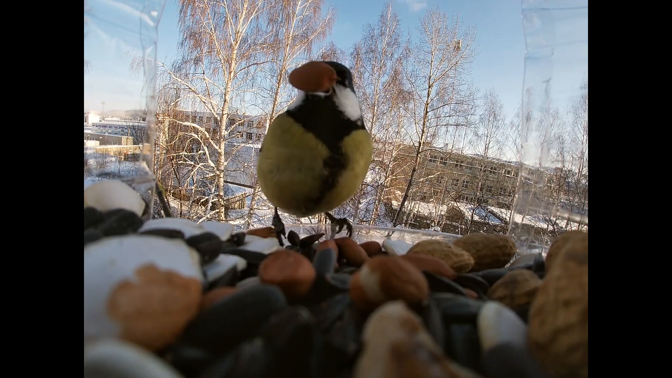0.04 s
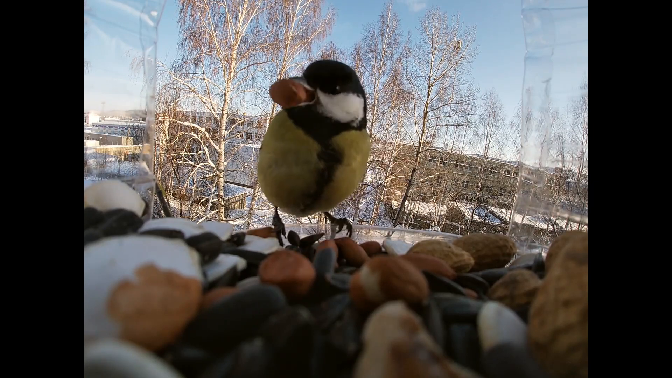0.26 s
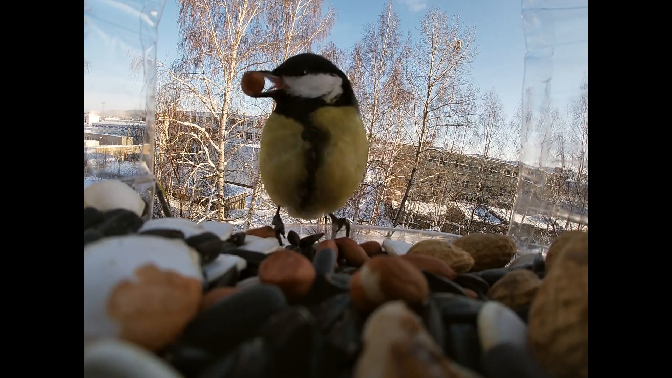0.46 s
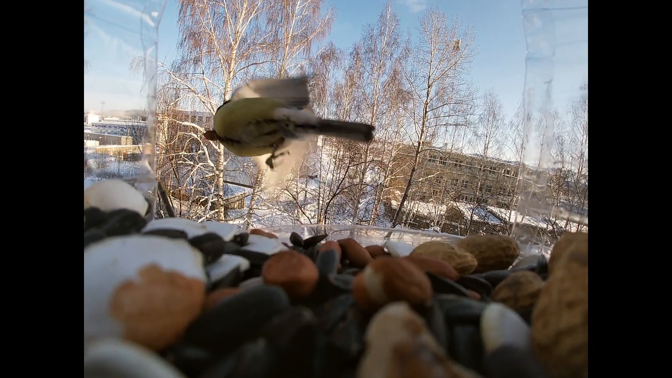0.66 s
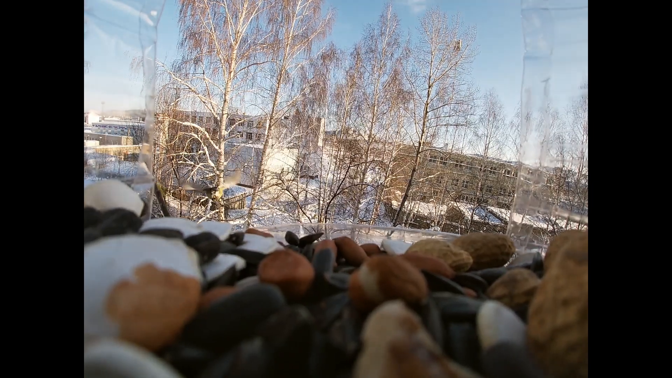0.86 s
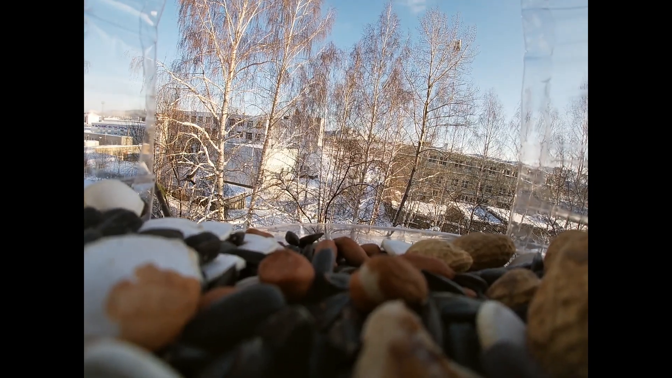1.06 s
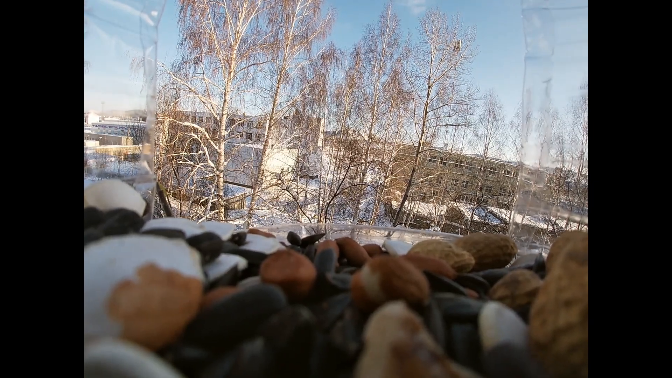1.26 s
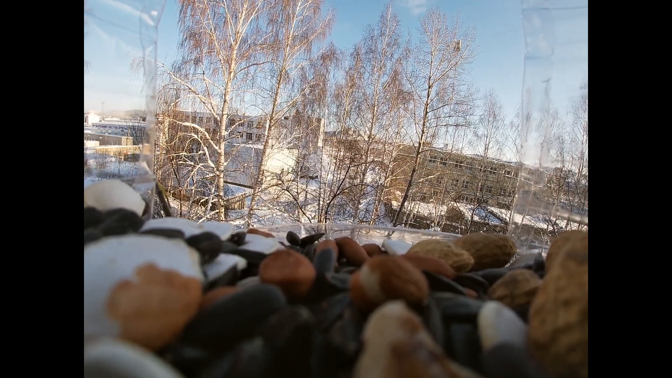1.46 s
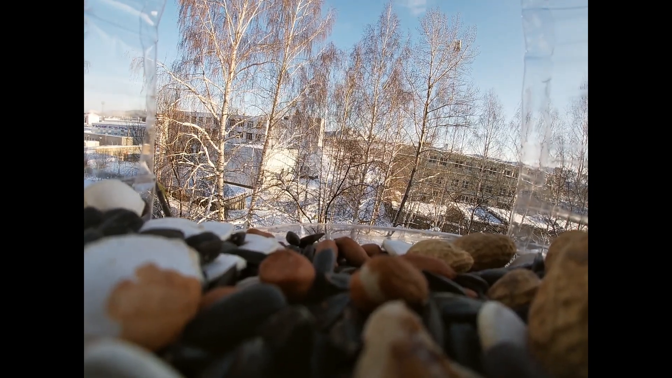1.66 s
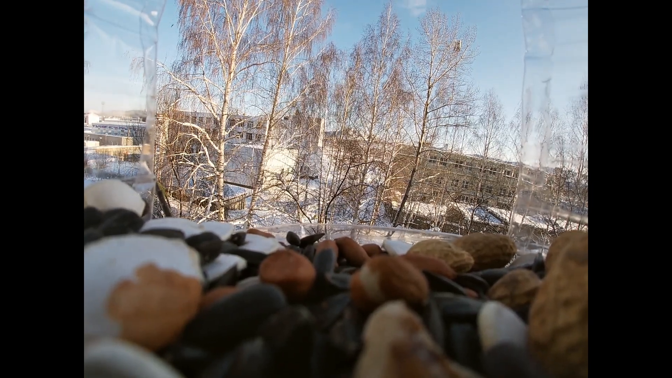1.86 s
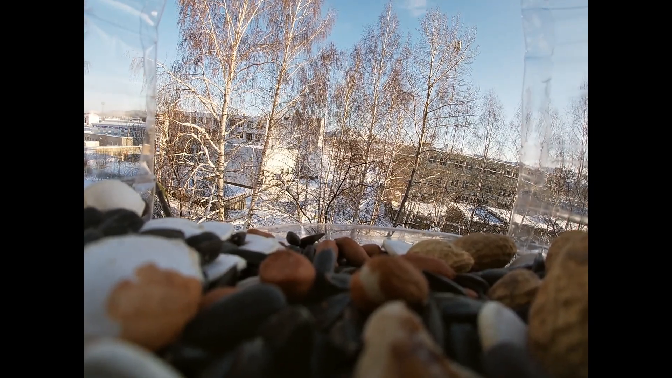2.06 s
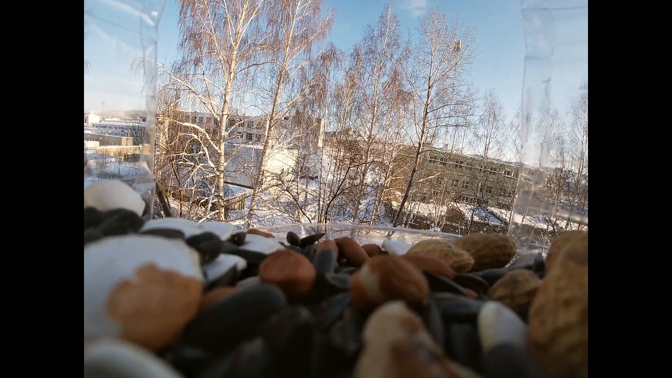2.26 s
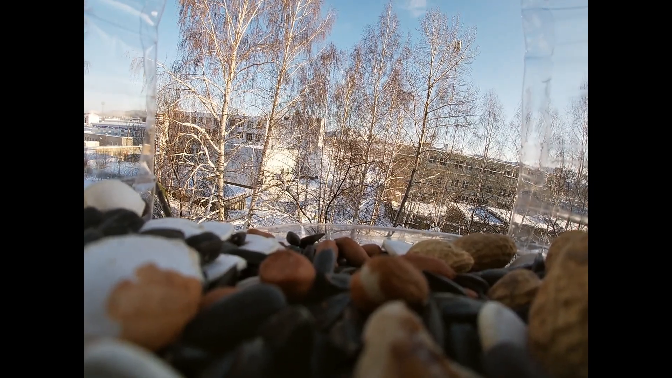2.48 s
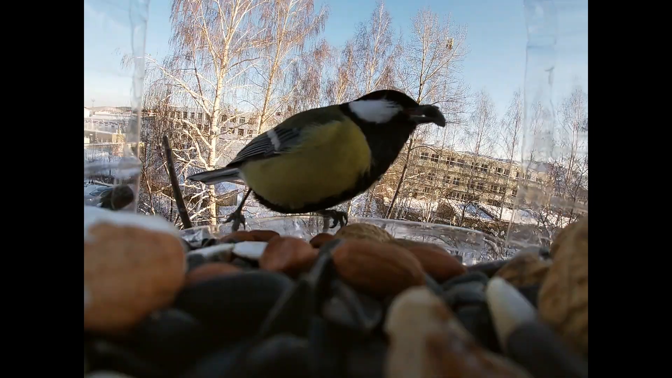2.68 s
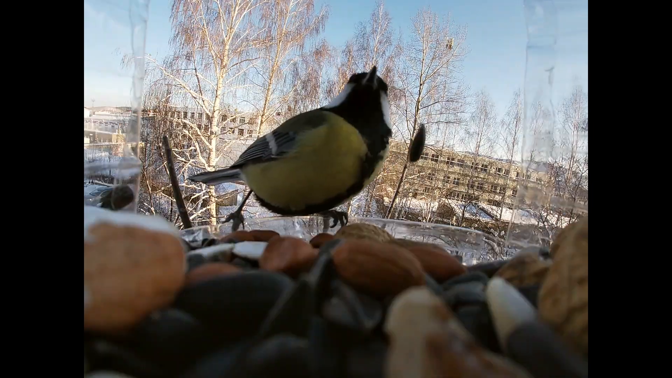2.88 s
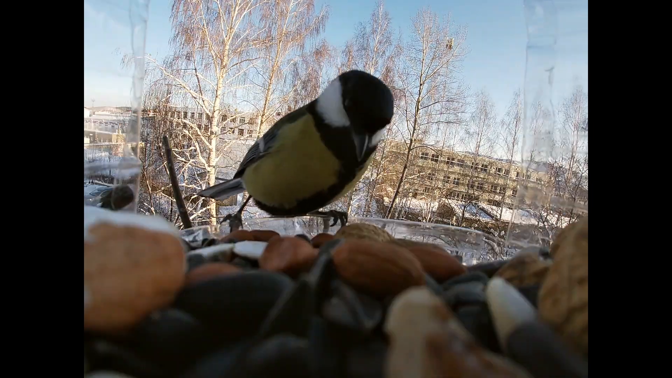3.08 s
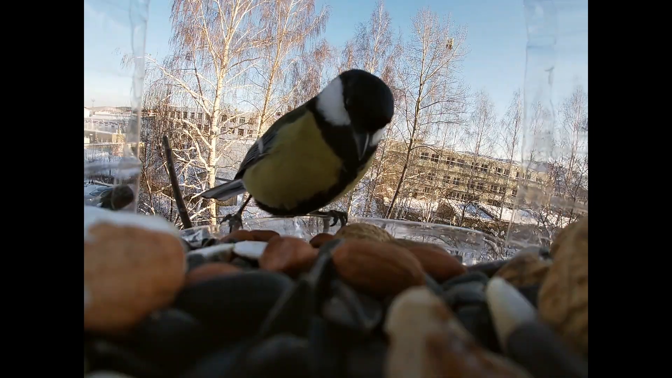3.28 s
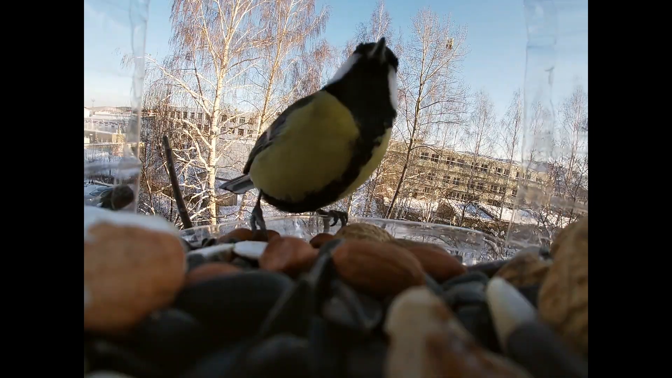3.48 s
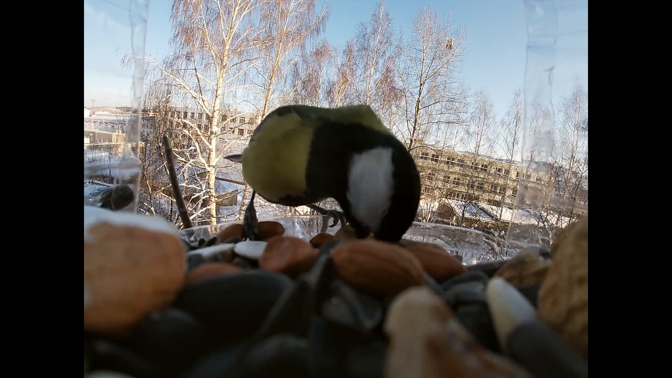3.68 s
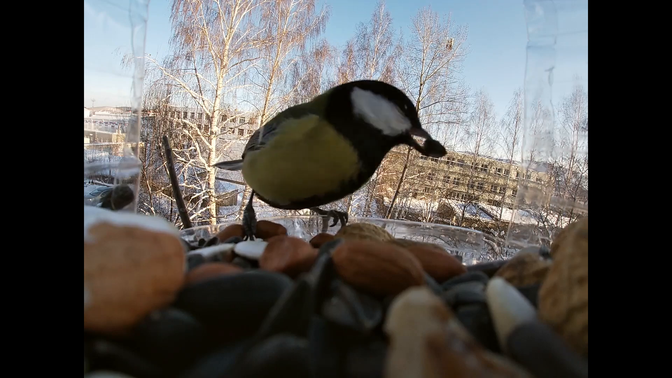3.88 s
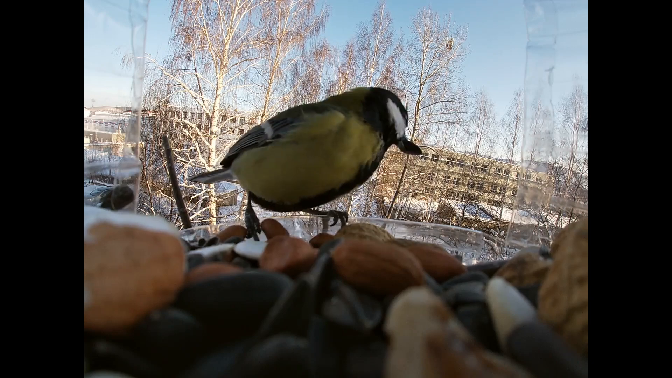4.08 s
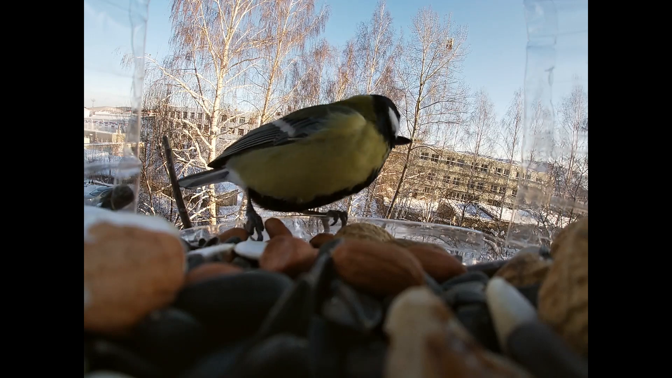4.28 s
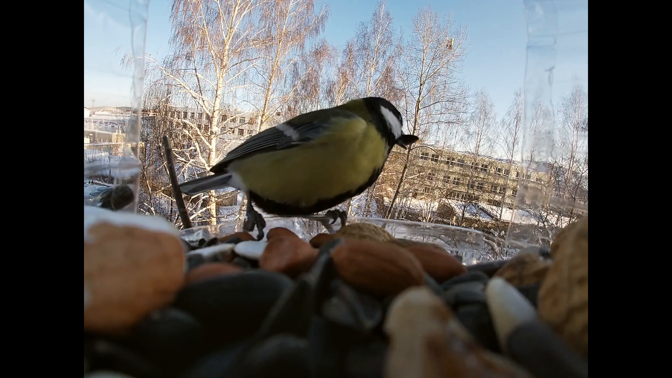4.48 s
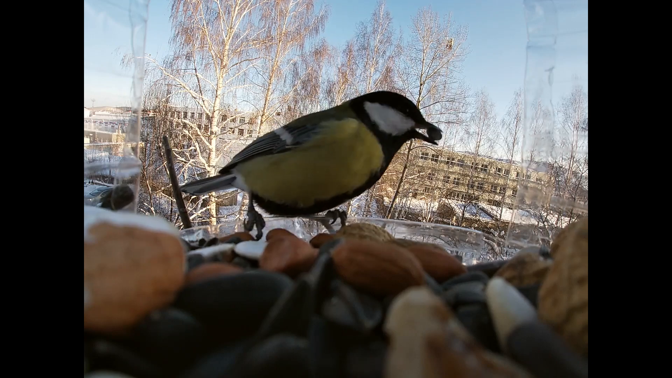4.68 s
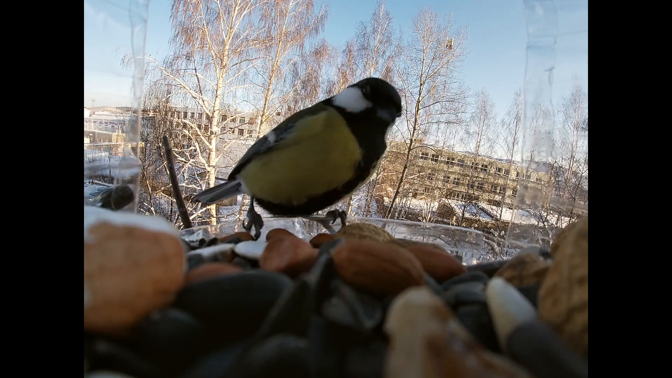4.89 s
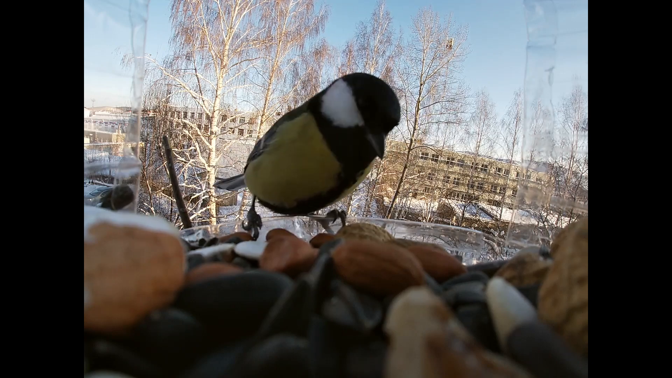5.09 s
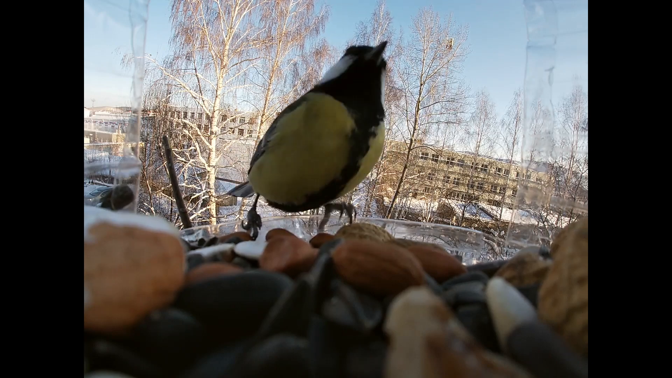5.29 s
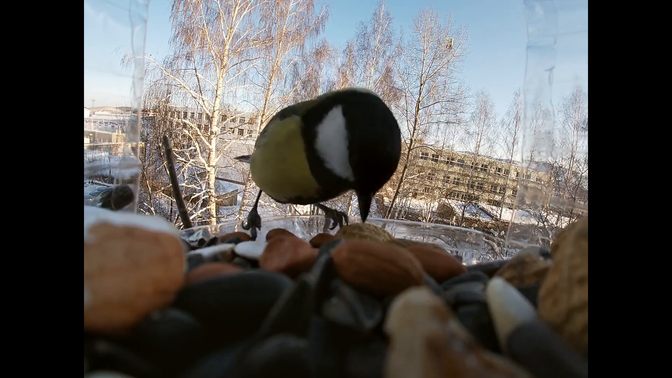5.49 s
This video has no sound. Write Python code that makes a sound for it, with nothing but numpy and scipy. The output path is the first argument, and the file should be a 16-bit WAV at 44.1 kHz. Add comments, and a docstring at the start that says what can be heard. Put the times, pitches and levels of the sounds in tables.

```python
"""At a feeder cut from a plastic bottle, a small camera's microphone lies among the nuts and seeds; a town hums outside.
A great tit shuffles close by, calls and whirrs off past the microphone, its wings throwing puffs of air.
Birds whistle far off; at about 2.55 s the road wash drops abruptly. The next tit mouths a seed, hops, drops it and pecks.
Shaped noise makes town, feathers and air; gliding sines make the whistles and a faint whine.
Noise bursts and runs of tiny slips drive bands and ringing modes: beak, claws and husks click, and the bottle thuds."""
import sys
import numpy as np
from scipy import signal
from scipy.fft import rfft, irfft
from scipy.io import wavfile
from scipy.ndimage import uniform_filter1d

SR = 44100
rng = np.random.default_rng(int(sys.argv[2]) if len(sys.argv) > 2 else 0)


def log_audio(samples):
    """Write samples as a 16-bit WAV file to the path given in sys.argv[1]."""
    # one column per channel
    frames = np.atleast_2d(samples).T
    # limit to full scale, then quantise
    limited = np.clip(frames, -1, 1)
    pcm = np.round(limited * 32767).astype(np.int16)
    wavfile.write(sys.argv[1], SR, pcm)


N = 244314


def gain_of(db):
    """Decibels to amplitude."""
    return 10 ** (np.asarray(db) / 20)


def evened(x):
    """Scales to rms 1."""
    return x / np.sqrt(np.mean(x ** 2) + 1e-20)


def clock(length):
    """Sample times over a length in seconds, at least eight of them."""
    return np.arange(max(round(length * SR), 8)) / SR


def add(mix, s, sound):
    """Mixes a sound in at a time in seconds, which may lie before the start."""
    start = round(s * SR)
    sound = sound[max(-start, 0):]
    part = mix[max(start, 0):][:len(sound)]
    part += sound[:len(part)]


def level(times, db):
    """Gain that follows a curve in decibels."""
    return gain_of(np.interp(np.arange(N) / SR, times, db))


def noise(colour):
    """Steady noise of a given spectrum, at rms 1."""
    hz, db = np.transpose(colour)
    log_hz = np.log(np.fft.rfftfreq(N, 1 / SR) + 1)
    shape_db = np.interp(log_hz, np.log(hz), db)
    return evened(irfft(rfft(rng.standard_normal(N)) * gain_of(shape_db), N))


def band(x, hz, spread, order=2):
    """A broad resonance reaching from hz / (1 + spread) to hz * (1 + spread)."""
    edges = [min(hz / (1 + spread), .4 * SR), min(hz * (1 + spread), .48 * SR)]
    return signal.sosfilt(signal.butter(order, edges, "bandpass", fs=SR, output="sos"), x)


def wavering(count, waver, smoothing):
    """Pitch factor around 1 that wanders as smoothed noise; waver is its rms share."""
    return 1 + waver * evened(uniform_filter1d(rng.standard_normal(count), size=smoothing))


# the town outside, far away: t/s, rumble level/dB, road wash level/dB, hiss level/dB
TOWN_LEVELS = [(0, -48.5, -63, -74), (.3, -49, -65, -79), (1.2, -50, -59.5, -76.5),
               (2.548, -49.5, -58.5, -76.5), (2.558, -52.5, -68.5, -75.5), (3.6, -51.5, -64.5, -73),
               (4.6, -52, -64.5, -73), (4.76, -52.5, -68, -77), (5.54, -53, -62, -72.5)]
# spectra of the three layers: f/Hz, relative level/dB per Hz
RUMBLE_COLOUR = [(20, -5), (60, -8), (110, -9.5), (170, 1), (300, -2.5), (460, -1.5), (600, -19),
                 (800, -24.5), (1200, -40), (3000, -73.5)]
ROAD_COLOUR = [(300, -17.5), (600, 6), (750, 4), (1000, 4.5), (1250, 1), (1500, 2), (2000, -5.5),
               (2700, -6), (3300, -24), (5000, -64), (12000, -59.5)]
HISS_COLOUR = [(1000, -16), (3000, 6), (5000, 4.5), (7000, 0), (9500, -1), (10800, -12), (12500, -17),
               (16000, -26)]


def town():
    """Far traffic: a low rumble, the wash of tyres and a thin hiss, each noise with its own level curve."""
    times, *levels = np.transpose(TOWN_LEVELS)
    colours = [RUMBLE_COLOUR, ROAD_COLOUR, HISS_COLOUR]
    return sum(noise(colour) * level(times, db) for colour, db in zip(colours, levels))


def puff(length, db, corner_hz, lowest_hz=14, steepness=1.99, eddy_hz=60, top_hz=750):
    """One swell of eddies buffeting the microphone: noise that weakens above the corner; rms level in dB."""
    hz = np.fft.rfftfreq(SR, 1 / SR)
    window = np.hanning(len(clock(length)))
    turbulence = hz ** 2 / (hz ** 2 + lowest_hz ** 2) / np.sqrt(1 + hz / eddy_hz) / (1 + (hz / top_hz) ** 4)
    shape = turbulence / (1 + (hz / corner_hz) ** steepness)
    random_phase = np.exp(2j * np.pi * rng.random(len(hz)))
    eddies = irfft(shape * random_phase, SR)[:len(window)]
    return gain_of(db) * evened(eddies * window)


# stray air on the microphone, strongest from a passing wing tip: middle t/s, length t/s, level/dB, corner f/Hz
AIR_PUFFS = [(.01, .14, -39.5, 95), (.823, .04, -22.5, 220), (0.876, .03, -17, 300),
             (0.906, 0.039, -24, 238), (.945, .06, -28, 130), (1.325, .19, -44, 85), (2.711, .18, -54, 40),
             (3.8, 0.48, -57, 90), (4.055, .13, -54.5, 60), (5.467, .08, -47.5, 100)]


def puffs():
    """Single puffs of air reach the microphone."""
    out = np.zeros(N)
    for s, length, db, corner_hz in AIR_PUFFS:
        add(out, s - length / 2, puff(length, db, corner_hz))
    return out


# short, stiff rings of the plastic shell around the microphone: f/Hz, width f/Hz, level/dB
SHELL_RINGS = [(1470, 170, 3.5), (1673, 130, 4), (2478, 120, -2.5), (2853, 73, -0.5), (3215, 460, -4),
               (5270, 700, -0.5)]


def shell(x):
    """The bottle's shell adds its narrow resonances to whatever sounds inside it."""
    rings = [gain_of(db) * signal.lfilter(*signal.iirpeak(hz, hz / width, fs=SR), x)
             for hz, width, db in SHELL_RINGS]
    return x + sum(rings)


def ring(x, modes, scatter=0.017):
    """Drives decaying modes; each pitch scatters by a small rms share, as the place of the blow differs."""
    t = np.arange(len(x)) / SR
    answer = np.zeros(len(x))
    for k, (hz, db, t60) in enumerate(modes):
        shifted_hz = hz * (1 + scatter * rng.standard_normal())
        answer += (-1) ** k * gain_of(db - 60 * t / t60) * np.sin(2 * np.pi * shifted_hz * t)
    return signal.fftconvolve(x, answer)[:len(x)]


# modes of the thin wall: f/Hz, level/dB, 60 dB decay t/s
WALL_MODES = [(608, -4.5, .03), (723, 3, 0.041), (850, -4.5, 0.033), (972, -1.5, 0.034),
              (1135, -2.5, 0.023)]
# modes of the whole laden bottle: f/Hz, level/dB, 60 dB decay t/s
BOTTLE_MODES = [(105, -10, 0.088), (142, -6, 0.21), (180.5, 3.5, 0.11), (239, 2.5, 0.055),
                (291.5, -3, 0.085), (345.3, 1.5, 0.076), (430, -0.5, 0.045), (542, -11, 0.09)]
TICK_HZ, TICK_AT_DB, TICK_OCTAVES_PER_DB = 7950, -45, .006  # stronger ticks lie slightly higher


def contact(force, push, length, db, hardness_db, husk_hz, thud_db, wall_db, tick_spread, husk_spread):
    """Sharp force rings tip, husk and shell; blunter push rings wall and bottle. Levels are rms over the length."""
    tick_db = db + hardness_db
    tick_hz = TICK_HZ * 2 ** (TICK_OCTAVES_PER_DB * (tick_db - TICK_AT_DB))
    tick = band(force, tick_hz, tick_spread)
    # larger, lower husks ring longer
    husk = band(shell(force), husk_hz, husk_spread * (husk_hz / 2800) ** 0.38)
    wall, bottle = ring(push, WALL_MODES), ring(push, BOTTLE_MODES)
    parts = [(tick, tick_db), (husk, db), (wall, wall_db), (bottle, thud_db)]
    return sum(gain_of(part_db) * x * np.sqrt(length * SR / np.sum(x ** 2)) for x, part_db in parts)


def friction(length, slips_per_s=800, spread_db=3.5, rub=0.12, rattle_s=0.0014,
             edge=0.17, edge_per_s=4, catch_db=1.5):
    """A run of tiny uneven slips over a fine rub; it comes in clumps as the grip catches and lets go."""
    # long strokes swell and fade more gently
    stroke = signal.windows.tukey(len(clock(length)), min(edge + edge_per_s * length, 1))
    count = len(stroke)
    grip = uniform_filter1d(rng.standard_normal(count), size=220)
    stroke = stroke * gain_of(catch_db * evened(grip))
    slip_gain = gain_of(spread_db * np.minimum(rng.exponential(1, count), 3))
    slips = (rng.random(count) < slips_per_s / SR) * slip_gain
    # an eighth of a second is left for what rings on
    slips, stroke = np.pad([slips * stroke, stroke], ((0, 0), (0, SR // 8)))
    # every slip leaves its own brief rattle
    rattle_power = signal.fftconvolve(slips ** 2, np.exp(-2 * clock(.012) / rattle_s))[:len(slips)]
    rattle = np.sqrt(np.abs(rattle_power))
    return (slips + 0.22 * rattle + rub * stroke) * rng.standard_normal(len(slips))


def seeds(force, grip_s=0.0079, lowest_hz=1700, highest_hz=9500, ring_db=7, count=7):
    """The contact passes from seed to seed, and each lends its own note while it is touched."""
    notes = np.geomspace(lowest_hz, highest_hz, count) * 2 ** rng.uniform(-.2, .2, count)
    wander = rng.standard_normal((count, len(force)))
    touched = uniform_filter1d(wander, max(round(grip_s * SR), 1)) > 0
    ringing = sum(band(force * on, hz, spread=.045, order=1) for hz, on in zip(notes, touched))
    return force + gain_of(ring_db) * ringing


WALL_BELOW_THUD_DB = -15.5  # rubbing moves the whole bottle more than its thin wall
# claws shuffle through seeds close by, and now and then the bird's body rustles against them: t/s, length t/s,
# husk level/dB, tick over husk level/dB, bottle thud level/dB
SCRAPES_AND_RUSTLES = [(0.002, 0.012, -49, -3, -43), (0.103, 0.023, -61, -1, -54), (0.355, 0.115, -66, -13, -44.5),
                       (0.59, 0.068, -63.5, -7.5, -50), (0.661, 0.025, -46.5, -6, -50),
                       (0.723, 0.0061, -47, 3, -44), (0.751, 0.008, -33, -2, -30), (2.951, 0.125, -66.5, -4, -63),
                       (3.11, 0.045, -67.5, 0, -44), (3.155, 0.135, -70.5, 2, -52),
                       (3.445, 0.044, -57.5, 0, -48.5), (3.629, 0.03, -59, -6, -39),
                       (3.658, .032, -52.5, -7, -39.5), (3.688, 0.027, -49, -1, -35), (3.715, 0.084, -71, 1, -49),
                       (3.794, 0.017, -50, 6, -36.5), (3.818, .0065, -48, -5, -37), (3.852, .037, -60, -7, -49),
                       (3.996, 0.046, -51.5, -4, -43), (4.043, 0.028, -42.5, -4.5, -44),
                       (4.089, .035, -58, -8, -45), (4.388, 0.084, -59.5, -9, -55), (4.442, .016, -50, -14, -45),
                       (4.472, 0.042, -52, -12, -44), (4.527, .018, -54.5, -9, -40.5), (4.55, 0.07, -68, -20, -43),
                       (5.039, 0.078, -66, -3, -53.5), (5.322, 0.024, -62, -5, -46), (5.459, .011, -41, -12, -37),
                       (5.485, 0.017, -46, -8, -50)]


def scrapes(husk_hz=2500, octaves_per_db=.035):
    """Claws drag seeds over the floor and the body rustles among them; the harder the seed, the higher its
    note."""
    out = np.zeros(N)
    for s, length, db, hardness_db, thud_db in SCRAPES_AND_RUSTLES:
        force = friction(length)
        hz = husk_hz * 2 ** (octaves_per_db * hardness_db)
        add(out, s, contact(seeds(force), force, length, db, hardness_db, hz, thud_db,
                            thud_db + WALL_BELOW_THUD_DB, tick_spread=0.24, husk_spread=0.79))
    return out


# blows of beak, claw or dropped seed beside the microphone:
# t/s, husk level/dB, tick over husk level/dB, husk f/Hz, bottle thud level/dB, wall knock level/dB
BLOWS = [(0.0256, -44.5, -6, 2900, -54, -52), (0.077, -52, 4, 3200, -58, -54),
         (0.574, -55, -10, 2900, -44, -64), (0.755, -35, -5, 2600, -30, -31.5),
         (0.9895, -55, -13, 2200, -47, -60), (3.0428, -33.5, 5.5, 2900, -36, -35.5),
         (3.0533, -34, 4.5, 3100, -31, -40), (3.0853, -45, 18, 5000, -35.5, -42),
         (3.0993, -57, 17.5, 4200, -40.5, -50.5), (3.2586, -50.5, 4, 2900, -42.5, -47),
         (3.2953, -60.5, 3, 2200, -42.5, -58), (3.5, -38, 5, 3800, -48, -61),
         (3.5211, -33.5, -6.5, 2100, -30, -31.5), (3.5475, -35.5, -14, 2100, -33, -35),
         (3.6424, -55, -9, 2400, -45, -52), (3.8374, -29.5, -16, 2800, -37.5, -40),
         (4.0435, -46, -5, 3300, -43, -49), (4.076, -40, -17, 3600, -50, -46),
         (4.0837, -32, -4.5, 3200, -39, -38.5), (4.48, -45, -13, 1800, -50.5, -62),
         (4.6012, -50, -13, 2000, -41, -59), (4.9474, -39.5, 10.5, 3200, -37, -38.5),
         (4.9581, -30.5, 1, 2600, -39.5, -50), (4.9856, -46.5, -21, 2500, -53, -62),
         (5.095, -55.5, -7, 2800, -48.5, -54.5), (5.3795, -38.5, -.5, 3300, -39, -64),
         (5.4533, -24.5, -3.5, 2450, -29.5, -36), (5.5015, -36, -4.5, 3500, -39, -45.5)]


def knocks(crack_s=0.00046, rattle_s=0.0028, rattle_db=-13, echo_s=0.0021, echo_db=-15,
           tail_s=0.011, tail_db=-42, graze_s=0.0018, graze_db=-26):
    """Each blow grazes, cracks, comes back off the bottle wall and dies away among the seeds."""
    lead_s = .006  # room for the graze before the touch
    out, t = np.zeros(N), clock(0.1576) - lead_s
    after = np.maximum(t, 0)
    touch = np.diff(t >= 0, prepend=False)  # one sample at the moment of contact
    crack = np.exp(-after / crack_s)
    echo = gain_of(echo_db) * np.exp(-np.abs(t - echo_s) / crack_s)
    rattle = gain_of(rattle_db) * np.exp(-after / rattle_s)
    tail = gain_of(tail_db) * np.exp(-after / tail_s)
    graze = gain_of(graze_db) * np.exp(-np.abs(t) / graze_s)
    envelope = np.where(t < 0, graze, crack + echo + rattle + tail)
    for s, *colour in BLOWS:
        force = 1.64 * touch + envelope * rng.standard_normal(len(t))
        push = 9 * touch + (t >= 0) * np.exp(-after / 0.0025) * rng.standard_normal(len(t))
        add(out, s - lead_s, contact(force, push, 0.0088, *colour, tick_spread=0.24, husk_spread=0.54))
    return out


# the beak closes on a seed that it holds: t/s, length t/s, husk level/dB
BEAK_NIBBLES = [(.026, .0085, -55), (0.076, 0.021, -54), (2.628, 0.007, -51), (2.68, 0.0052, -50),
                (2.738, 0.0094, -50), (2.939, 0.01, -53.5), (3.248, .005, -59), (4.251, 0.007, -55),
                (4.349, 0.0096, -52), (4.416, 0.005, -48), (5.421, 0.018, -49.5)]


def nibbles(hardness_db=1.5, husk_hz=3900, through_legs_db=-7):
    """The held seed slips in the beak: short and bright, and little of it reaches the bottle."""
    out = np.zeros(N)
    for s, length, db in BEAK_NIBBLES:
        force = friction(length)
        thud_db = db + through_legs_db
        add(out, s, contact(seeds(force), force, length, db, hardness_db, husk_hz, thud_db,
                            thud_db + WALL_BELOW_THUD_DB, tick_spread=0.33, husk_spread=0.85))
    return out


def settling(delay_s=.005, length_s=.025, fade_s=.008, below_blow_db=-26,
             hardness_db=-10, husk_hz=2200, below_thud_db=-14):
    """After every blow the jolted seeds slide briefly back to rest: fading friction."""
    out = np.zeros(N)
    for s, db, _, _, thud_db, _ in BLOWS:
        force = friction(length_s)
        force = force * np.exp(-np.arange(len(force)) / SR / fade_s)
        push_db = thud_db + below_thud_db
        add(out, s + delay_s, contact(seeds(force), force, length_s, db + below_blow_db, hardness_db, husk_hz,
                                      push_db, push_db + WALL_BELOW_THUD_DB, tick_spread=0.24, husk_spread=0.79))
    return out


# a faint whine that comes and goes: t/s, length t/s, f/Hz, level/dB
FAINT_WHINES = [(.35, 0.055, 1495, -64), (3.27, 0.15, 1530, -73), (4.13, 0.31, 1475, -70)]


def whines(waver=0.017):
    """A thin sine of wavering pitch swells and fades."""
    out = np.zeros(N)
    for s, length, hz, db in FAINT_WHINES:
        window = np.hanning(len(clock(length))) ** .5
        phase = 2 * np.pi * np.cumsum(hz * wavering(len(window), waver, 200)) / SR
        add(out, s, gain_of(db) * evened(window * np.sin(phase)))
    return out


# bird calls, gliding by way of a crest pitch, level before the echoes:
# t/s, length t/s, start f/Hz, crest f/Hz, end f/Hz, level/dB, octave over fundamental level/dB, waver share
BIRD_CALLS = [(0.628, 0.041, 6250, 7240, 6550, -63.5, -40, .003),
              (1.44, 0.115, 4300, 4900, 4150, -69, -22, 0.029),
              (1.448, 0.063, 5600, 5900, 5000, -78, -30, .02),
              (1.952, 0.12, 3950, 4650, 3450, -68.5, -22, 0.0098),
              (2.412, 0.11, 4250, 4380, 2200, -72, -20, 0.026),
              (2.395, .14, 4850, 4750, 3290, -77, -7, .018)]


def chirps(crest=0.32, yard_db=-11, yard_t60=.3, wall_s=0.025, wall_db=-11):
    """Gliding whistles with a weaker octave; a house wall repeats them and the yard smears them."""
    out = np.zeros(N)
    for s, length, start_hz, crest_hz, end_hz, db, octave_db, waver in BIRD_CALLS:
        u = clock(length) / length
        before = np.maximum(1 - u / crest, 0)
        beyond = np.maximum((u - crest) / (1 - crest), 0)
        hz = crest_hz + (start_hz - crest_hz) * before ** 1.3 + (end_hz - crest_hz) * beyond ** 1.1
        phase = 2 * np.pi * np.cumsum(hz * wavering(len(u), waver, 60)) / SR
        swell = signal.windows.tukey(len(u), .6)
        whistle = np.sin(phase) + gain_of(octave_db) * np.sin(2 * phase)
        add(out, s, gain_of(db) * evened(whistle * swell))
    t = clock(0.4)
    yard = rng.standard_normal(len(t)) * gain_of(-60 * t / yard_t60)
    yard *= gain_of(yard_db) / np.linalg.norm(yard)
    add(yard, wall_s, gain_of([wall_db]))
    return out + signal.fftconvolve(out, yard)[:N]


def nearness(t, closest_s, passing_s):
    """Closest distance over present distance, for a straight flight past the microphone."""
    return 1 / np.hypot(1, (t - closest_s) / passing_s)


# the take-off: wings beat steadily while the bird passes the microphone
FIRST_BEAT_S, BEATS_PER_S, FLIGHT_S = .742, 24, .46
# spectrum of the feather rush before the shell: f/Hz, relative level/dB
FEATHER_SPECTRUM = [(400, 15), (900, 4.5), (1700, 5.5), (3200, 1.5), (5200, -12), (7500, -0.5), (9500, 0),
                    (11000, -7), (15000, -16)]


def feathers(open_s=.645, opening_s=.07, closest_s=.785, passing_s=.11, falloff=2.8,
             peak_db=-44, beat_db=3.5, flicker_db=2.5):
    """The wings open; the rush of feathers throbs with their beat and fades with distance."""
    t = np.arange(N) / SR
    beat = np.cos(2 * np.pi * BEATS_PER_S * (t - FIRST_BEAT_S))
    flicker = evened(uniform_filter1d(rng.standard_normal(N), size=200))
    opening = np.clip((t - open_s) / opening_s, 0, 1)
    swell = opening * nearness(t, closest_s, passing_s) ** falloff
    rush = evened(shell(noise(FEATHER_SPECTRUM)))
    return rush * swell * gain_of(peak_db + beat_db * beat + flicker_db * flicker)


def downwash(closest_s=.832, passing_s=.105, falloff=3.25, peak_db=-20.5, stroke_s=.074, far_hz=45, near_hz=72):
    """Every wing beat throws a puff; the closer the wing, the stronger and quicker its eddies."""
    out = np.zeros(N)
    for s in FIRST_BEAT_S + np.arange(0, FLIGHT_S, 1 / BEATS_PER_S):
        near = nearness(s, closest_s, passing_s)
        corner_hz = far_hz + (near_hz - far_hz) * near
        add(out, s - stroke_s / 2, near ** falloff * puff(stroke_s, peak_db, corner_hz))
    return out


# what the microphone port lets through: f/Hz, level/dB
PORT_RESPONSE = [(9000, 0.5), (10100, -0.5), (10700, -9.5), (11400, -12.5), (12600, -8.5), (14300, -7.5),
                 (15100, -14.5), (16000, -24)]


def port(x):
    """The narrow microphone port passes little of the top treble."""
    hz, db = np.transpose(PORT_RESPONSE)
    response_db = np.interp(np.fft.rfftfreq(len(x), 1 / SR), hz, db)
    return irfft(rfft(x) * gain_of(response_db), len(x))


def scene():
    """One microphone hears everything, so both channels are alike."""
    through_port = port(scrapes() + knocks() + nibbles() + settling() + feathers())
    mono = town() + puffs() + through_port + whines() + chirps() + downwash()
    return np.array([mono, mono])


EDGE_HZ = 16300


def record(dry):
    """The camera's band limit: a steep low-pass."""
    lowpass = signal.firwin(511, EDGE_HZ, window=("kaiser", 9), fs=SR)
    return signal.oaconvolve(dry, lowpass[None], "same")


dry = scene()
out = record(dry)
log_audio(out)
```